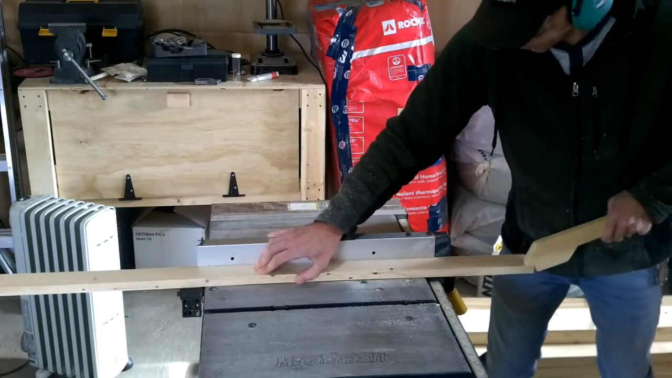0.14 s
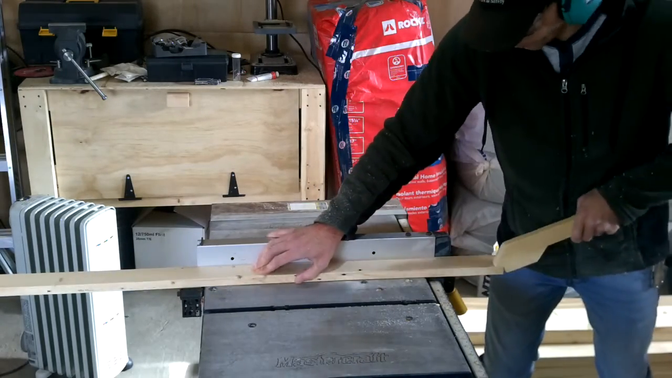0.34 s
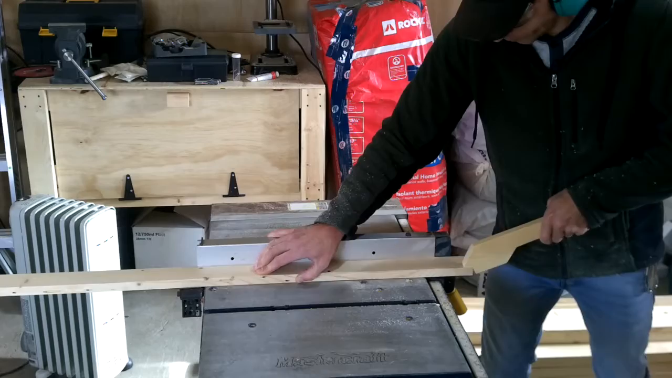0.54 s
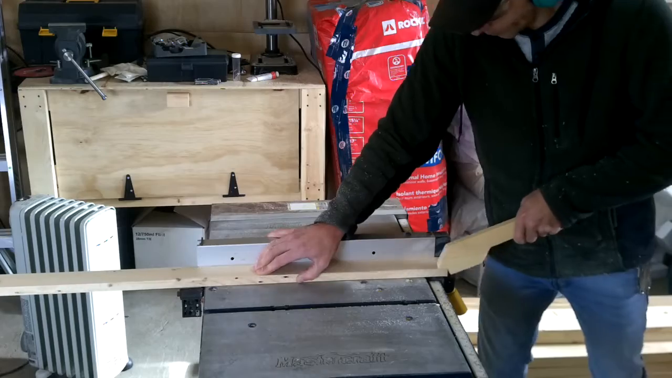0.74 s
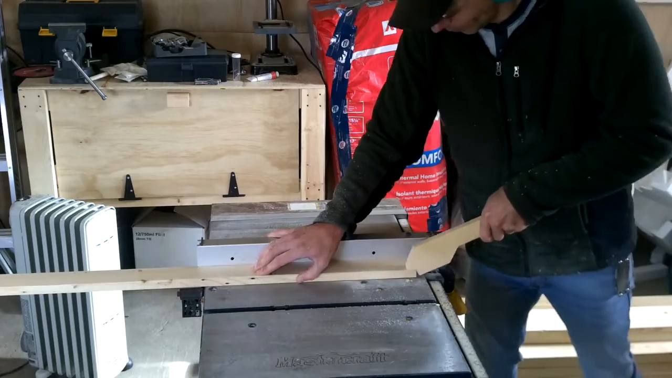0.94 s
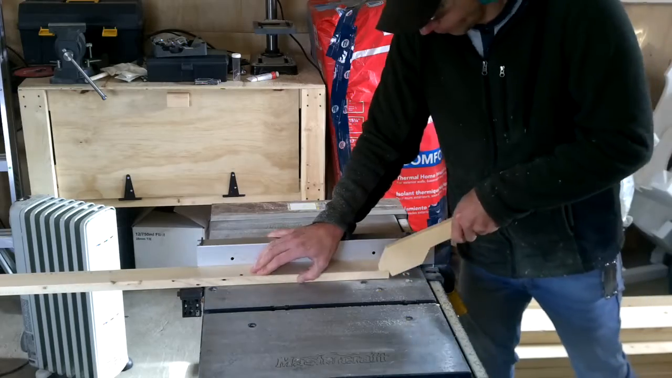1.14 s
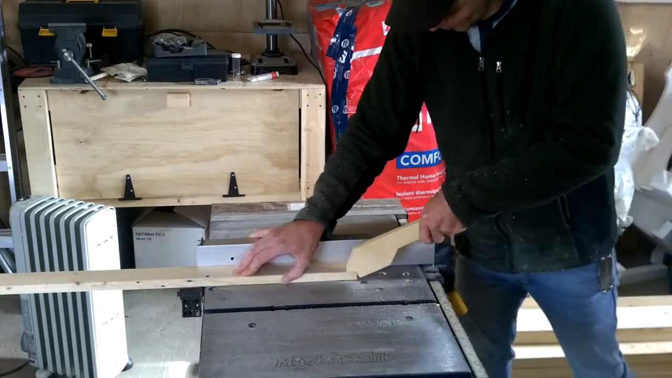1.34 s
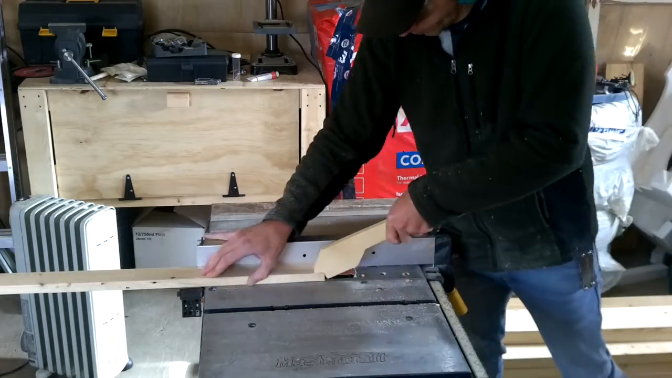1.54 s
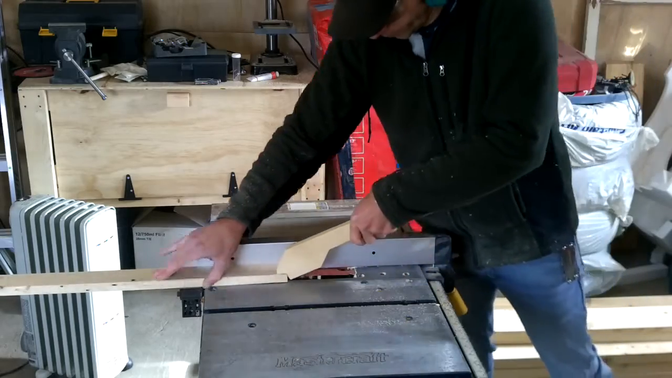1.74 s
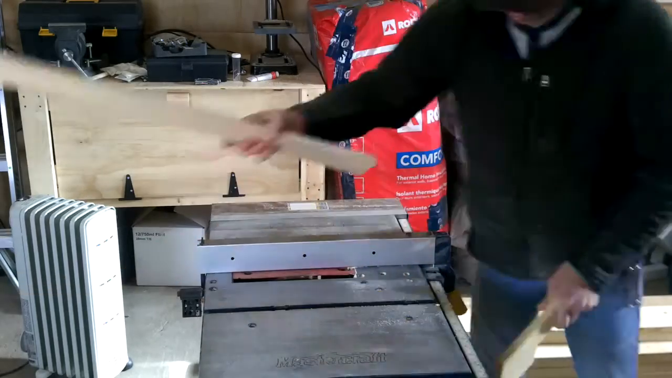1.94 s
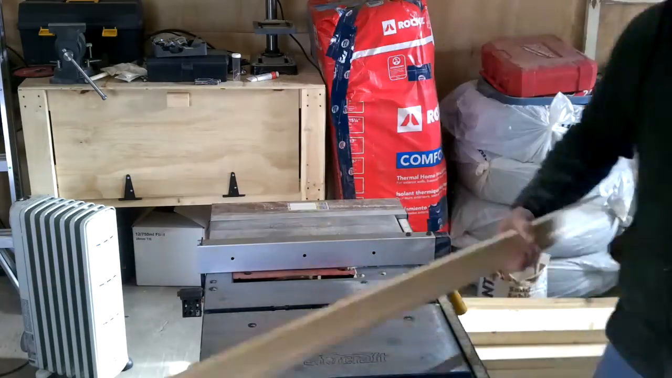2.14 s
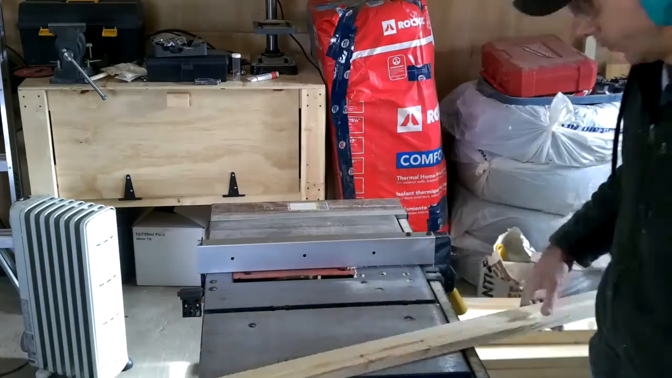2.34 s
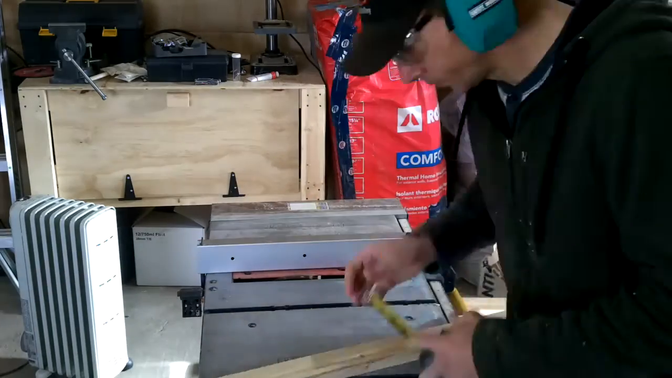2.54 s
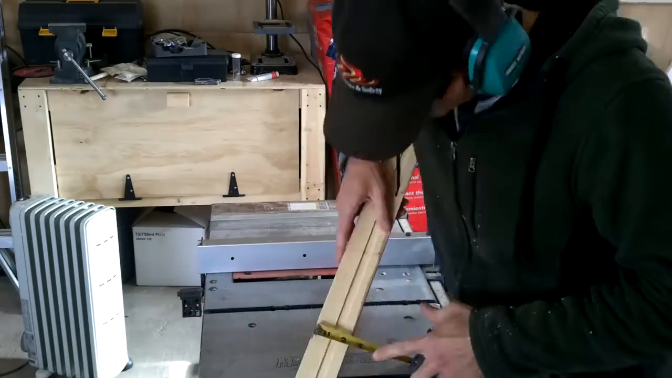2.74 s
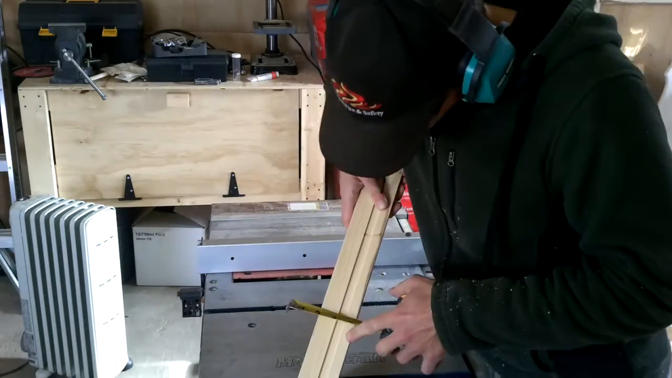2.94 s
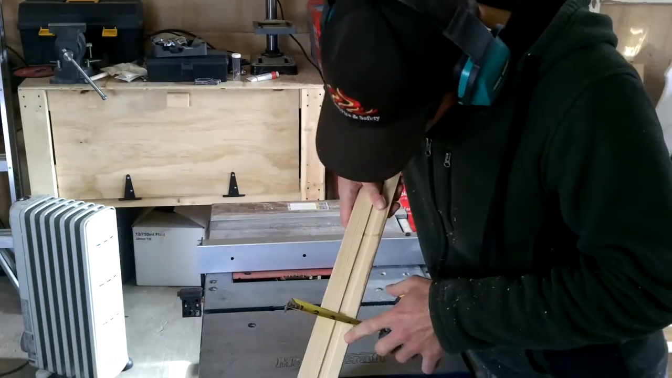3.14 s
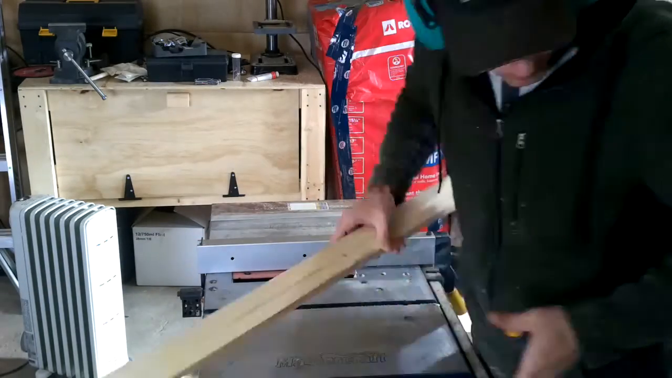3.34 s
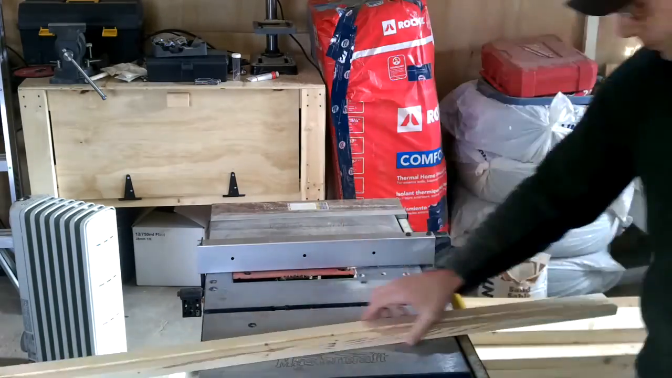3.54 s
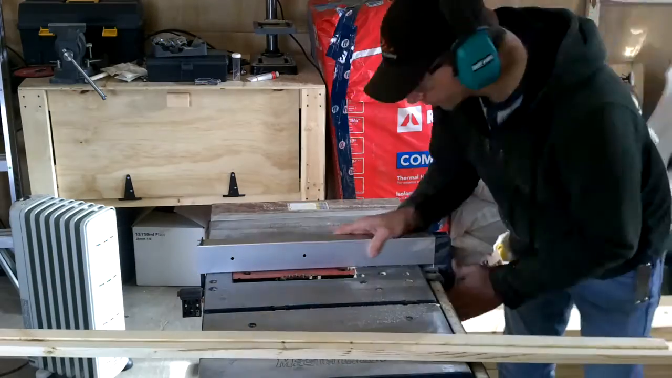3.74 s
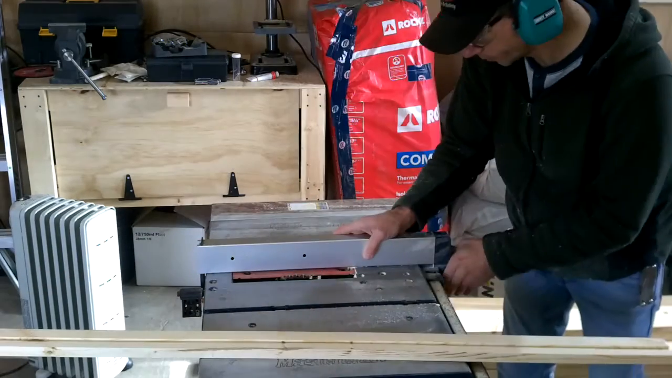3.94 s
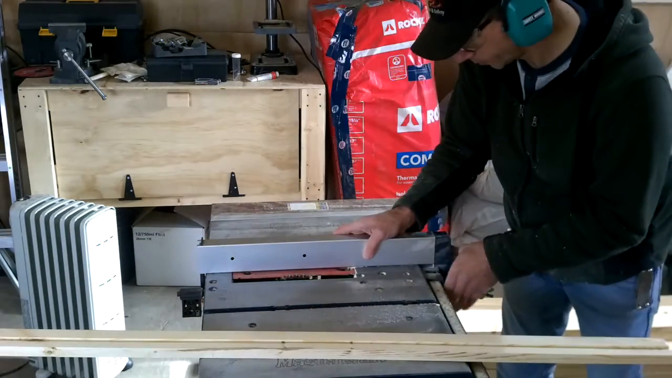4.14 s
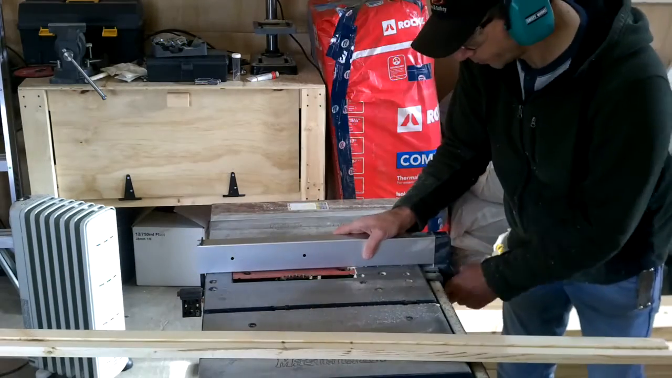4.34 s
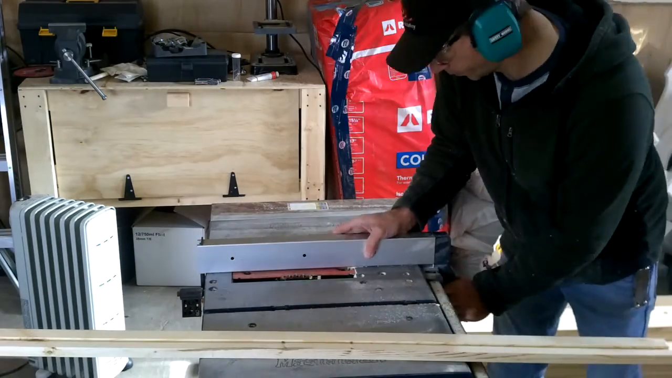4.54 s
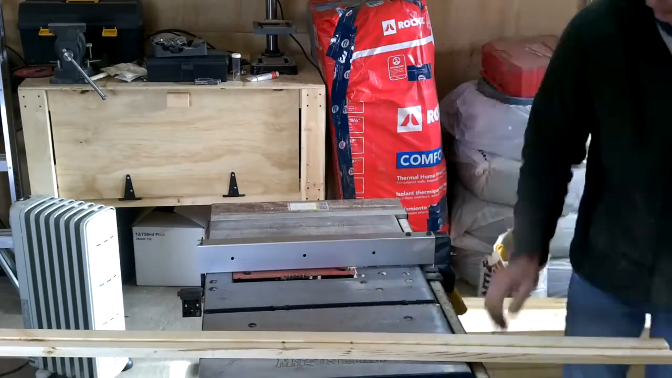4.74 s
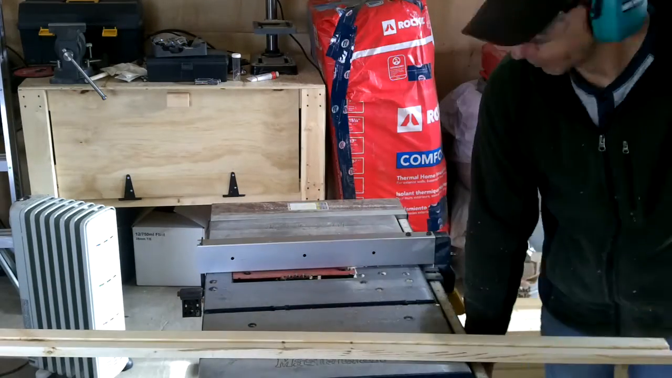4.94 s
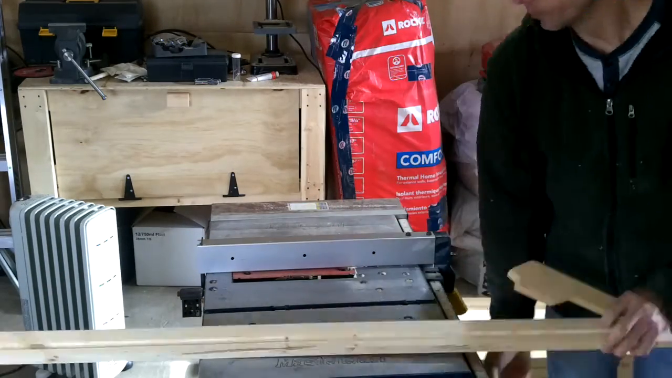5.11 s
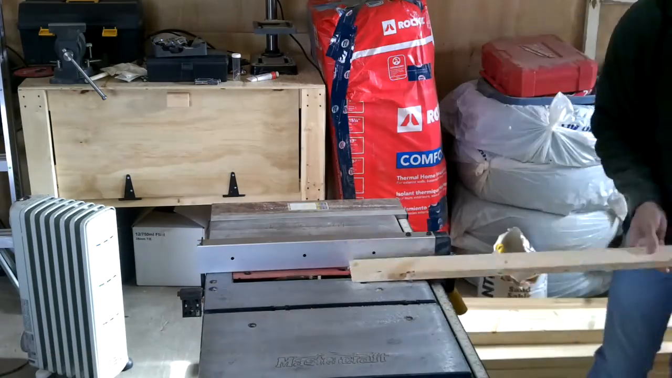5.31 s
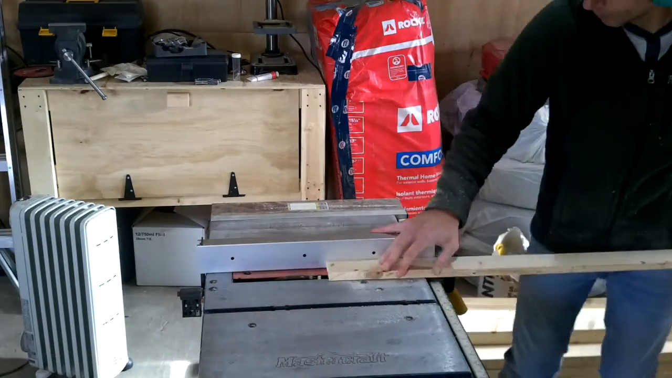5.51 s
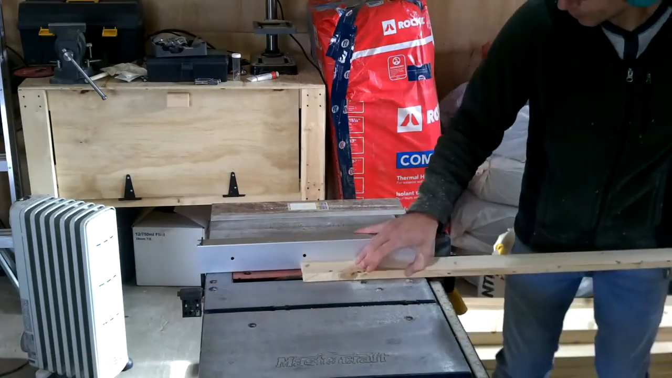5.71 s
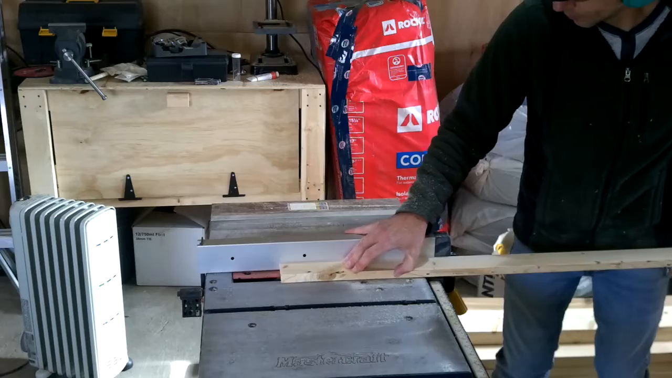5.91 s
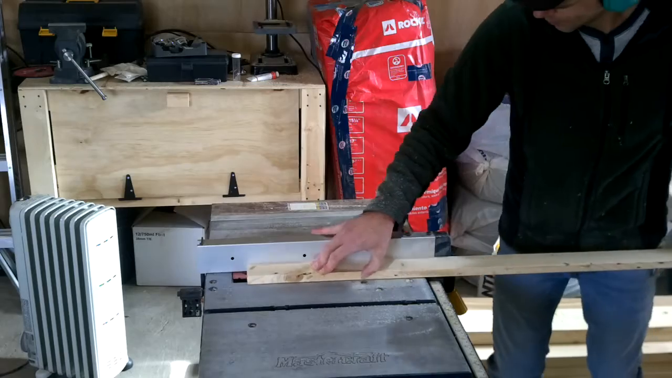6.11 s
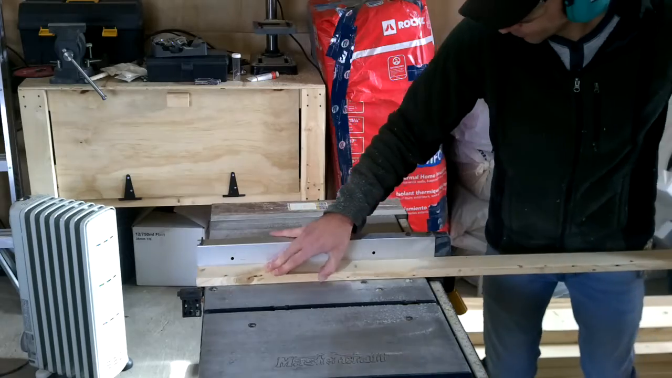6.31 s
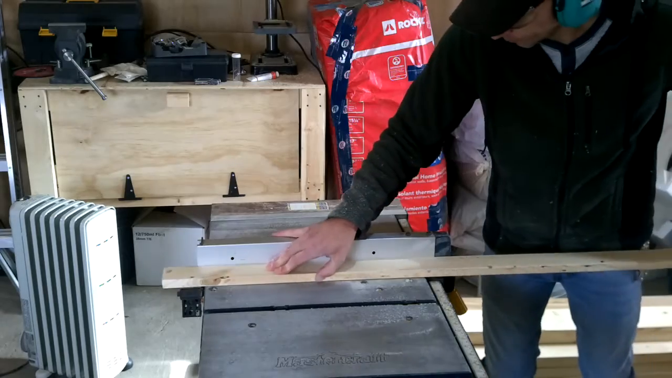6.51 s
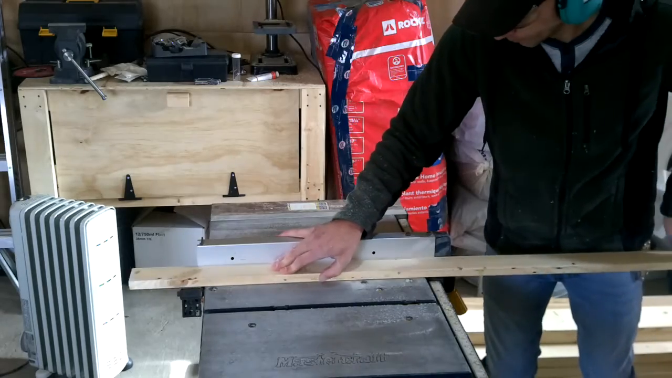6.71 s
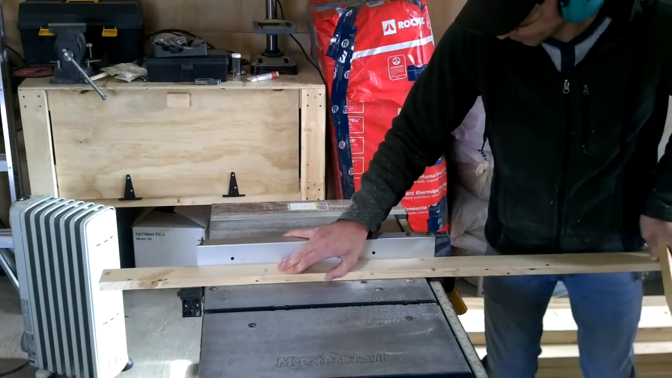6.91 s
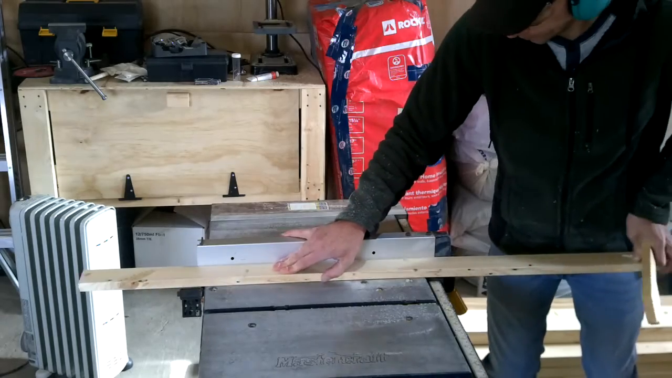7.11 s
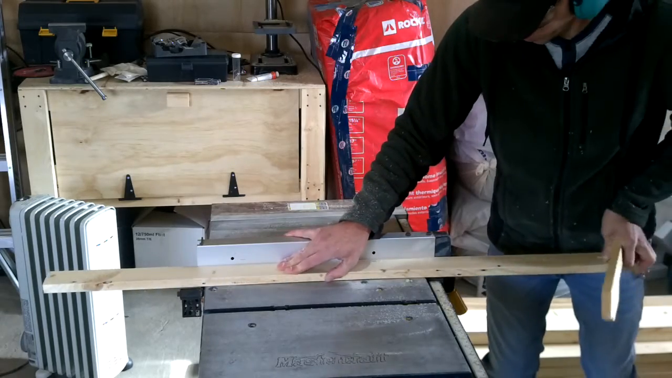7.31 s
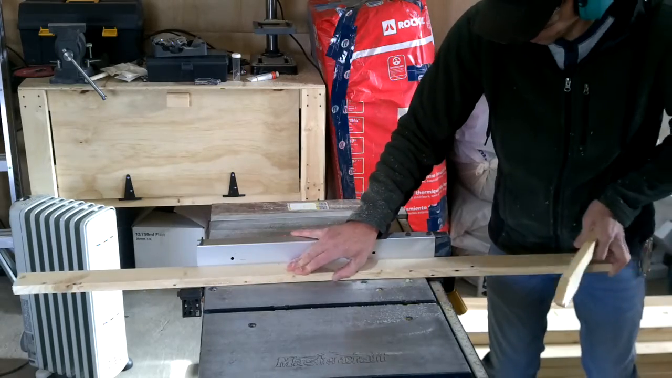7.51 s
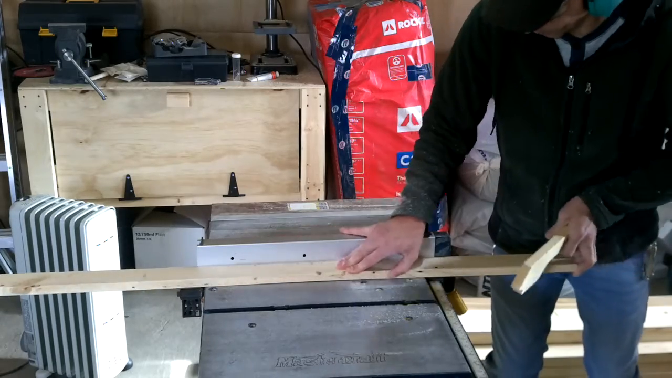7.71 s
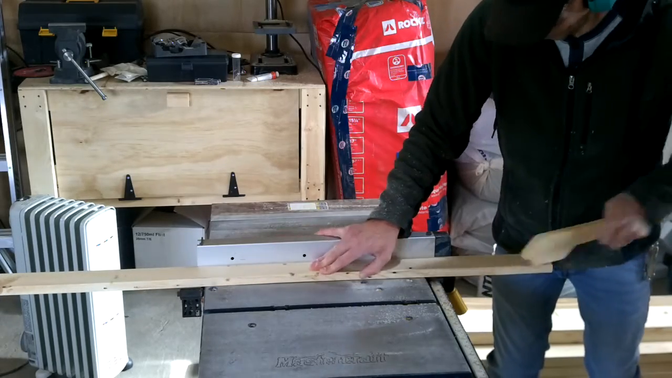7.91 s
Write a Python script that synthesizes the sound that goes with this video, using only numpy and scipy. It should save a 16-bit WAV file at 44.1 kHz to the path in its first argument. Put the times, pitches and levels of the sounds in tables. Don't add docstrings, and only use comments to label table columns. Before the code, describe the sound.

A benchtop saw's piercing whine and bright hiss dip slightly under load, then the motor cuts out and its tone falls to rest. Light hiss remains under a sharp click, wooden taps, fence knocks, a very loud metallic clack and small scrapes. The motor then snaps on, rising to speed almost at once, and runs harsh and full to the end. Small, close, tinny workshop sound.

```python
import sys
import numpy as np
from scipy import signal
from scipy.fft import rfft, irfft
from scipy.io import wavfile
from scipy.ndimage import uniform_filter1d

SR = 44100
rng = np.random.default_rng(int(sys.argv[2]) if len(sys.argv) > 2 else 0)


def magnitude_from_level(level_db):
    exponent = np.asarray(level_db, float) / 20
    return 10 ** exponent


def transcribe(u):
    v = np.clip(np.atleast_2d(u).T, -1, 1)
    q = np.round(v * 32767).astype(np.int16)
    wavfile.write(sys.argv[1], SR, q)


N = 351036

OFF_S, ON_S = 2.12, 5.1615


def evened(x):
    return x / np.sqrt(np.mean(x ** 2) + 1e-20)


def read(points, hz):
    f, value = np.transpose(points)
    return np.interp(np.log(hz + 1), np.log(f + 1), value)


def columns(rows):
    s, *rest = np.transpose(sorted(rows))
    return [np.interp(np.arange(N) / SR, s, c) for c in rest]


def add(mix, s, sound):
    part = mix[round(s * SR):][:len(sound)]
    part += sound[:len(part)]


def shaped(x, gain):
    return irfft(rfft(x) * gain(np.fft.rfftfreq(len(x), 1 / SR)), len(x))


def drift(per_s):
    width = int(SR / 64 / per_s) + 1
    steps = rng.standard_normal(N // 64 + 2)
    smooth = uniform_filter1d(uniform_filter1d(steps, width), width)
    return np.interp(np.arange(N) / 64, np.arange(len(steps)), evened(smooth))


def still():
    # f/Hz, level/dB per Hz
    hiss_colour = [(18, -49.5), (30, -29.5), (103, -11.5), (145, -10), (239, -12), (280, -15), (328, -10),
                   (702, -8), (937, -7.5), (1720, -7.5), (16000, -18)]
    # f/Hz, level/dB rms
    hum_lines = [(240.5, -84.5), (721, -93), (1440, -87)]
    hiss = evened(shaped(rng.standard_normal(N), lambda hz: magnitude_from_level(read(hiss_colour, np.maximum(hz, 120)))))
    t = np.arange(N) / SR
    hum = sum(np.sqrt(2) * magnitude_from_level(db) * np.sin(2 * np.pi * hz * t) for hz, db in hum_lines)
    return magnitude_from_level(-66) * hiss + hum


def ridges(hz):
    # f/Hz, width/Hz, level/dB
    resonances = [(2640, 91, -19), (2970, 27, -44.5), (3750, 83, -13.5), (4440, 90, -6.5), (4580, 65, -4),
                  (5510, 170, -13), (5700, 100, -15.5), (6210, 99, -13), (6700, 19, -15), (7040, 84, -17.5),
                  (7580, 49, 0), (8370, 97, -13), (8915, 77, -5), (9670, 180, -9), (10500, 60, -6),
                  (11280, 330, -8), (12300, 250, -9), (14250, 80, -7), (15400, 160, -6),
                  (2632, 41, -7.5), (2135, 70, -11), (2300, 60, -15), (3300, 79, -13.5), (3576, 37, -7.5),
             (3770, 41, -9), (4000, 22, -11), (4330, 100, -8), (4810, 43, -13)]
    # f/Hz, width/Hz, depth (0-1)
    notches = [(3000, 60, .5), (3497, 70, .6), (3684, 32, .7), (4140, 120, .65), (4485, 60, .4),
               (4950, 60, .4)]
    power = 1
    for f, width, db in resonances:
        if not 7450 < f < 7750:
            power = power + magnitude_from_level(db + 12.5) ** 2 / (1 + (2 * (hz - f) / width) ** 2)
    gain = np.sqrt(power)
    for f, width, depth in notches:
        gain = gain * (1 - np.clip(depth, 0, .95) / (1 + (2 * (hz - f) / width) ** 2))
    return gain


def ring(hz, t60, seconds=.35):
    t = np.arange(int(seconds * SR)) / SR
    return np.sin(2 * np.pi * hz * t) * magnitude_from_level(-60 * t / max(t60, .005)) * np.minimum(t / .002, 1)


def burst(ring_hz, t60, rise, tilt, hold):
    t = np.arange(int(.35 * SR)) / SR

    def colour(hz):
        swell = 1 + 1.8 / (1 + ((hz - ring_hz) / 250) ** 2)
        no_bass = 1 / np.sqrt(1 + (2500 / (hz + 1)) ** 10)
        return ridges(hz) * swell * ((hz + 1) / 6000) ** tilt * no_bass

    noise = evened(shaped(rng.standard_normal(len(t)), colour))
    after = np.maximum(t - max(hold, 0), 0)
    fall = magnitude_from_level(-60 * after / np.clip(t60, .01, .4)) + magnitude_from_level(-31.5 - 60 * after / .2)
    return 0.32 * noise * np.minimum(t / max(rise, .0003), 1) * fall


def metal():
    # t/s, peak level/dB, ring f/Hz
    clicks = [(2.826, -13.5, 6000), (3.566, -32, 3630), (3.7414, -51, 6200), (3.898, -32.5, 10700),
              (3.966, -18, 11400), (3.979, -26, 9140), (4.193, -39, 9170), (4.2887, -50, 4440),
              (4.414, -46, 7500), (4.465, -53, 4440), (4.5144, -52, 3770), (4.5614, -50, 3820),
              (4.596, -53, 3620), (4.658, -57, 2410), (4.887, -49, 3930), (5.0824, -51, 3720),
              (5.108, -54, 3960), (5.147, -49, 4200)]
    # t/s, peak level/dB, ring f/Hz, rise/s
    blows = [
        (3.5995, -16.5, 3000, .009),
        (3.6167, -12.5, 7680, .002),
        (3.9347, 2.5, 7540, .005),
    ]
    # t/s, peak level/dB, ring f/Hz, brightness slope, hold/s
    scrapes = [
        (3.426, -26.5, 6200, 0.49, .0034),
        (3.656, -46, 3750, -.44, .031),
        (3.690, -38.5, 6000, -.2, .018),
        (3.780, -39, 9400, -0.14, .033),
        (4.708, -50, 2440, -0.23, 0.027),
        (4.757, -46.5, 9800, -0.2, 0.028),
        (4.79, -55, 6500, -.2, .04),
        (4.862, -40.5, 3700, -0.82, .004),
        (5.046, -36.5, 3900, -.8, 0.0067),
    ]
    dull_per_db = .006
    out = np.zeros(N)
    for s, db, hz in clicks:
        add(out, s, magnitude_from_level(db) * burst(hz, .062, .002, dull_per_db * db, .0036))
    for s, db, hz, rise in blows:
        add(out, s, magnitude_from_level(db) * burst(hz, .055, rise, dull_per_db * db, rise + .001))
    for s, db, hz, tilt, hold in scrapes:
        add(out, s, magnitude_from_level(db) * burst(hz, .062, .002, tilt, hold))
    return out


def board():
    # t/s, peak level/dB, ring f/Hz, t60/s, crack against the ring/dB
    raps = [
        (2.248, -37, 1190, 0.049, 16),
        (2.373, -44.5, 1170, 0.066, 20),
        (2.404, -38, 1175, 0.057, 5),
        (3.53, -31, 1210, 0.05, 9.5),
        (3.548, -28.5, 1150, 0.04, 5),
    ]
    # ratio to ring, level/dB, share of t60
    modes = [(1, 3, 0.69), (.86, -6, 0.7), (0.48, -22, .9), (3.5, -6, 0.43), (2.9, -0.5, .6)]
    out = np.zeros(N)
    for s, db, hz, t60, crack_db in raps:
        knock = sum(magnitude_from_level(mode_db) * ring(ratio * hz, share * t60) for ratio, mode_db, share in modes)
        crack = magnitude_from_level(crack_db + 4.5) * burst(2.7 * hz, 0.07, 0.00085, -0.18, .003)
        add(out, s, magnitude_from_level(db) * (knock + crack))
    return out


def fittings():
    # t/s, level/dB
    hits = [
        (3.569, -43),
        (3.605, -30),
        (3.619, -33),
    ]
    # f/Hz, level/dB, t60/s
    fence = [(2300, -7, 0.046), (2680, 2, 0.067), (3300, -6, .04), (3700, -10, .05), (4500, -5, .05),
             (7600, 2, 0.06), (9500, -2, 0.053)]
    # f/Hz, level/dB, t60/s
    lever = [(6261, -44, .3), (12500, -45.5, .25),  (2730, -18, 0.032), (3615, -19, 0.036),
             (5090, -22, 0.047)]
    # f/Hz, level/dB, t60/s
    clunk = [(2750, -10, 0.026), (1890, -31, .05), (7640, -14, 0.14)]
    # t/s, f/Hz, level/dB, t60/s
    flares = [
        (2.161, 2680, -26, 0.087),
        (2.225, 2210, -40, .09),
        (2.238, 2670, -24, 0.099),
        (2.372, 2750, -27, .07),
    ]
    lever_s, clunk_s = 3.937, 5.162
    out = np.zeros(N)
    for s, db in hits:
        add(out, s, magnitude_from_level(db) * sum(magnitude_from_level(d + 2.6 * rng.standard_normal()) * ring(hz, t60) for hz, d, t60 in fence))
    for s, modes in ((lever_s, lever), (clunk_s, clunk)):
        add(out, s, sum(magnitude_from_level(db) * ring(hz, t60) for hz, db, t60 in modes))
    for s, hz, db, t60 in flares:
        add(out, s, magnitude_from_level(db) * ring(hz, t60))
    u = np.arange(-60, 61) / 12
    add(out, lever_s + 0.0011, magnitude_from_level(-31) * u * np.exp(-u ** 2))
    heave = (np.sin(np.pi * np.arange(300) / 105) + .1) * np.hanning(300)
    add(out, lever_s, magnitude_from_level(-36) * heave)
    return out


def motor():
    # t/s, whine f/Hz, whine level/dB, gear level/dB, shaft level/dB
    first_cut = [
        (0.0, 7609, -26, -40, -62),
        (0.25, 7572, -22, -49, -59),
        (0.65, 7582, -22, -55, -56),
        (0.9, 7600, -24, -56, -56),
        (1.05, 7574, -22, -47, -56),
        (1.4, 7582, -22, -45, -62),
        (1.72, 7550, -23, -41, -63),
        (1.88, 7686, -28, -38, -61),
        (2.11, 7708, -30, -38, -62),
    ]
    second_cut = [
        (5.4, 7635, -22, -40, -66),
        (5.6, 7635, -22, -36, -64),
        (5.75, 7640, -26, -35, -61),
        (6.3, 7609, -26, -34, -61),
        (6.55, 7642, -31, -36, -59),
        (6.9, 7646, -31, -38, -59),
        (7.1, 7670, -25, -40, -58),
        (7.72, 7672, -28, -58, -63),
        (7.86, 7655, -28, -50, -63),
        (7.96, 7580, -21, -45, -62),
    ]
    # f/Hz, level/dB
    coast_whine = [(1900, -85), (2120, -55), (2700, -46), (3040, -39), (3850, -34), (4300, -44),
                   (5500, -43), (7500, -35)]
    drag_per_s, friction_hz = 1.75, 1260
    spin_up_s, spin_up_bend = .0545, .81
    t = np.arange(N) / SR
    run_hz, whine_db, gear_db, shaft_db = columns(first_cut + second_cut)
    off, on = np.maximum(t - OFF_S, 0), np.maximum(t - ON_S, 0)
    resting = (t > OFF_S) & (t < ON_S)
    coast_hz = (first_cut[-1][1] + friction_hz) * np.exp(-drag_per_s * off) - friction_hz
    lag_khz = (t >= ON_S) * run_hz * np.exp(-(on / spin_up_s) ** spin_up_bend) / 1000
    hz = np.where(resting, np.maximum(coast_hz, 0), run_hz - 1000 * lag_khz)
    slack_db = -500 * np.maximum(off - .16, 0)
    dead_db = -18 * np.exp(-((hz - 7335) / 90) ** 2)
    whine_db = np.where(resting, read(coast_whine, hz), whine_db - 13 * lag_khz + dead_db)
    gear_db = np.where(resting, -43.5 + slack_db, gear_db - 2.5 * lag_khz ** 3 + 0.308 * dead_db)
    shaft_db = np.where(resting, -60 + slack_db, shaft_db - 9 * lag_khz)
    return hz, whine_db, gear_db, shaft_db


def effort(hz):
    # level/dB, low/dB, treble/dB, crackle/dB
    cut_rush = [(-24.5, -13, 4.5, -55.5), (-24.5, -13.5, 5, -54)]
    # share of full speed, level/dB, low against it/dB, treble against it/dB
    coast_rush = [(.05, -85, 3.5, -11), (.085, -54, 1.5, 3), (.125, -45, -3, 7.5), (.19, -42, -4, 10),
                  (.42, -32.5, -7.5, 9), (.53, -28.5, -10.5, 5.5), (.7, -26, -7.5, 6),
                  (.86, -24.5, -13, 2.5), (.97, -23.5, -10, 2)]
    # t/s, swell/dB
    spits = [
        (1.4, 4.6),
        (1.94, 6),
        (2.135, 5),
        (2.205, 12),
        (2.302, 7.4),
        (5.17, 11),
        (5.8, 3.6),
        (6.19, 3.5),
        (7.83, 4.3),
    ]
    t = np.arange(N) / SR
    on = np.maximum(t - ON_S, 0)
    before, after = t < ON_S, t >= ON_S

    strain_s, strain_fade_s = .15, .41
    strain_db = (2, 2, -0.5, 11.5)
    hump = (on / strain_s) ** 2 * np.exp(1 - (on / strain_s) ** 2)
    fade = np.exp(-on / strain_fade_s) * np.minimum(on / strain_s, 1)
    strain = .5 * hump + .5 * fade
    running = [np.where(before, a, b + c * strain) for a, b, c in zip(*cut_rush, strain_db)]
    level_db, low_db, treble_db, crackle_db = running

    freed_s, freed_db = 1.63, 1.2
    level_db = level_db + before * freed_db * np.clip((t - freed_s) / (OFF_S - freed_s), 0, 1)

    surge_s = .032
    surge_db = 3.5 - 60 * on - 30 * np.maximum(1 - on / .0021, 0)
    dip_db = -3.5 * np.exp((surge_s - on) / .02)
    level_db = level_db + after * np.where(on < surge_s, surge_db, dip_db)
    early = after * np.exp(-on / .08)
    low_db, treble_db, crackle_db = low_db + 8.8 * early, treble_db + 1.3 * early, crackle_db - 14 * early

    share, *laws = np.transpose(coast_rush)
    laws = [np.interp(hz / 7600, share, law) for law in laws]
    laws.append(-72 + .3 * (laws[0] - cut_rush[0][0]))
    resting = (t > OFF_S + .025) & before
    out = [np.where(resting, law, run) for law, run in zip(laws, (level_db, low_db, treble_db, crackle_db))]
    spit_db = sum(db * np.exp(-((t - s) / .015) ** 2) for s, db in spits)
    return *out[:3], out[3] + spit_db + 0.5 * drift(8)


def body(hz):
    # f/Hz, level/dB per Hz
    colour = [(710, -60.5), (1200, -34.5), (1870, -27), (2900, -9), (3160, -14), (3670, -1.5), (4460, -6),
              (4970, -5.5), (5530, -3.5), (7240, -2), (7800, 3.5), (8500, 1), (15700, 3)]
    return magnitude_from_level(read(colour, hz)) * ridges(hz)


def rush():
    level_db, low_db, treble_db, crackle_db = effort(motor()[0])
    air = shaped(rng.standard_normal(N), body)
    low = shaped(air, lambda hz: 1 / (1 + (hz / 3200) ** 12))
    treble = shaped(air, lambda hz: 1 - 1 / (1 + (hz / 7300) ** 8))
    middle = evened(air - low - treble)
    air = evened(low) * magnitude_from_level(low_db - 3.5) + middle + evened(treble) * magnitude_from_level(treble_db + 1.5)
    click_gain = magnitude_from_level(3.0 * np.minimum(rng.exponential(1, N), 5))
    clicks = rng.standard_normal(N) * click_gain * (rng.random(N) < 3500 / SR)
    clicks = clicks * magnitude_from_level(1.2 * drift(60))
    crackle = evened(shaped(clicks, lambda hz: 1 / np.sqrt(1 + (hz / 2500) ** 4)))
    return air * magnitude_from_level(level_db + 0.34 * drift(14)) + crackle * magnitude_from_level(crackle_db + 3.0)


def tones():
    # multiple of the whine, level against the gear tone/dB, fuzz/rad
    gears = [(0.285, -22, .3), (0.2946, -16.5, .3), (0.381, -15, .3), (0.3899, 0.5, 0.26), (0.4846, -2, .6),
             (.579, 0.5, .7), (.779, -5.5, 1.1), (1.169, -1.5, 1.1)]
    # multiple of the whine, level against the shaft tone/dB, fuzz/rad
    shaft = [(0.0948, -11, .2), (0.1891, 0.5, .2)]
    # multiple of the whine, level against the whine/dB, fuzz/rad
    sidebands = [(0.9056, -21, .4), (1.0138, -17, .4)]
    hz, whine_db, gear_db, shaft_db = motor()
    grid = np.arange(0, SR / 2, 10)
    ridge_db = 20 * np.log10(ridges(grid))
    turns = np.cumsum(hz * (1 + 0.00118 * drift(40))) / SR
    sweeping = np.clip(1 - hz / 7400, 0, .25) * 4
    whine_gain = magnitude_from_level(whine_db + (1.0 + .6 * sweeping) * drift(50))
    out = whine_gain * np.sin(2 * np.pi * turns + .3 * sweeping * drift(90))
    for level_db, orders in ((gear_db, gears), (shaft_db, shaft), (whine_db, sidebands)):
        for multiple, db, fuzz in orders:
            waver_db = 1.2 * drift(15) + 2.5 * fuzz * drift(60) - 2.2 * fuzz * sweeping
            room_db = 1.2 * sweeping * np.interp(multiple * hz, grid, ridge_db)
            tone = np.sin(2 * np.pi * multiple * turns + fuzz * drift(45))
            out = out + magnitude_from_level(level_db + db + waver_db + room_db) * tone
    return np.sqrt(2) * out


def scene():
    mono = still() + metal() + board() + fittings() + rush() + tones()
    return np.array([mono, mono])


def flecks(mono):
    # t/s, low f/Hz, high f/Hz
    patches = [(.295, 14500, 15940), (.295, 12400, 14050), (.71, 6290, 7700), (1.755, 10300, 14100),
               (2.8, 10300, 11900), (3.195, 7700, 9700), (3.195, 4400, 5200), (4.17, 7600, 9000),
               (5.8, 5150, 6400), (6.22, 14400, 16000), (6.31, 6300, 7650), (7.03, 10300, 11900),
               (7.05, 11700, 13300), (7.19, 9600, 11200), (7.19, 6300, 7640), (7.725, 5700, 7000),
               (7.91, 5700, 7700)]
    side, window = np.zeros(N), signal.windows.kaiser(2048, 6)
    for s, low_hz, high_hz in patches:
        start = round(s * SR) - 1024
        patch = shaped(mono[start - 700:][:2048], lambda hz: (hz > low_hz) & (hz < high_hz))
        add(side, start / SR, magnitude_from_level(-5.0) * patch * window)
    return side


def roll_off(x):
    return signal.sosfilt(signal.butter(12, 16790, fs=SR, output="sos"), x)


def record(dry):
    dry = 0.94 * np.tanh(dry / 0.92)
    edge = signal.firwin(1023, 15740, window=("kaiser", 9), fs=SR)
    edged = signal.oaconvolve(dry, edge[None], "same")
    mix = edged + np.outer([1, -1], flecks(edged[0]))
    return roll_off(mix)


dry = scene()
out = record(dry)
transcribe(out)
```